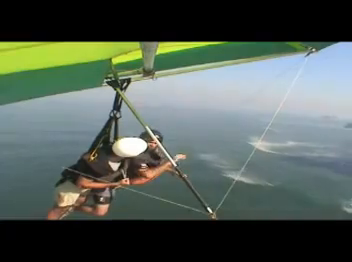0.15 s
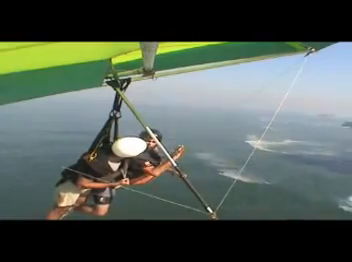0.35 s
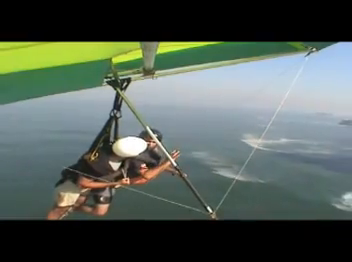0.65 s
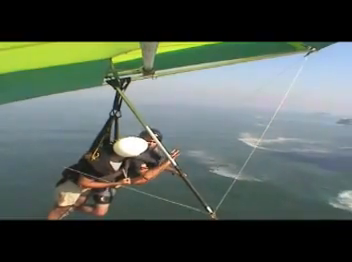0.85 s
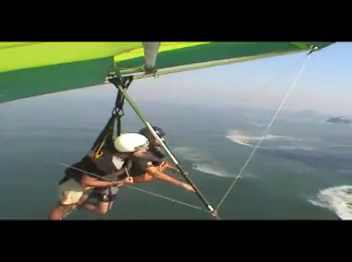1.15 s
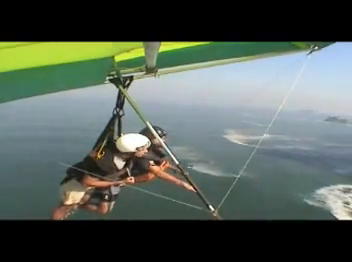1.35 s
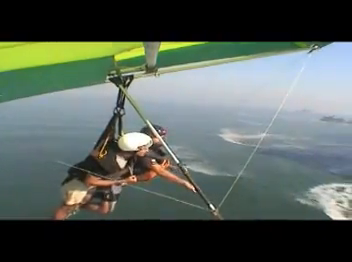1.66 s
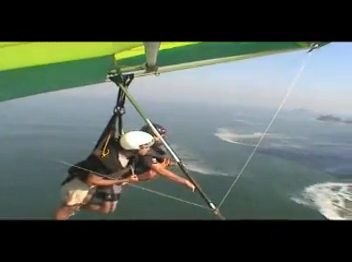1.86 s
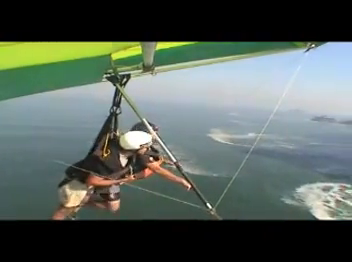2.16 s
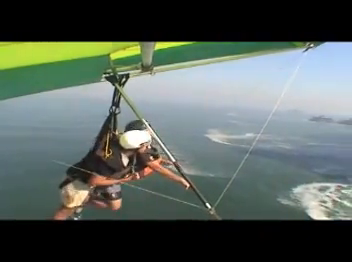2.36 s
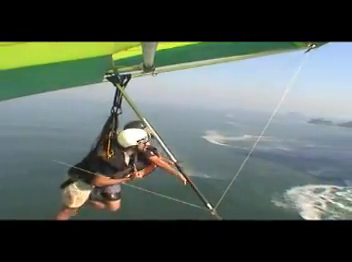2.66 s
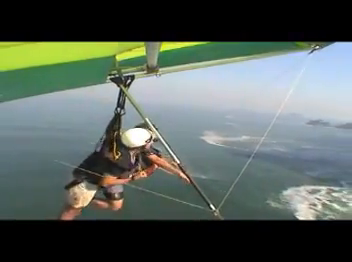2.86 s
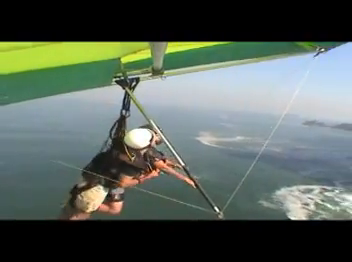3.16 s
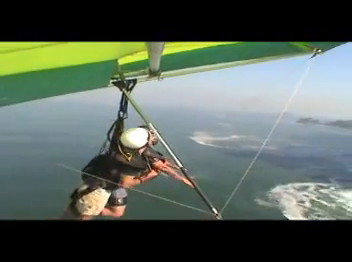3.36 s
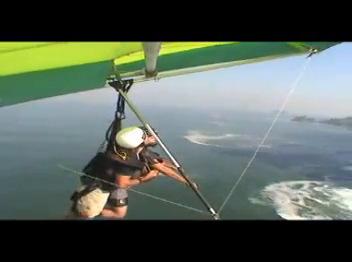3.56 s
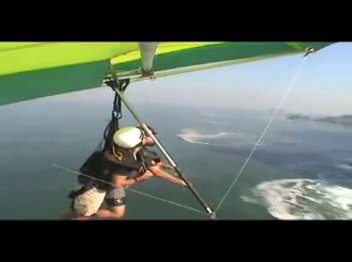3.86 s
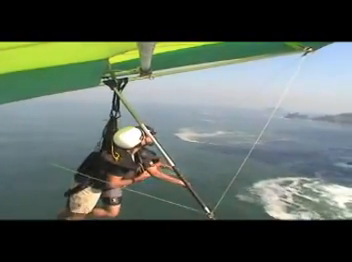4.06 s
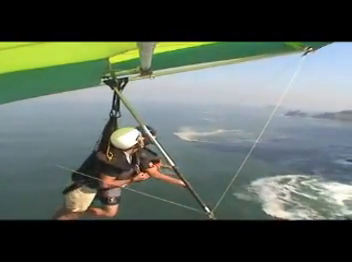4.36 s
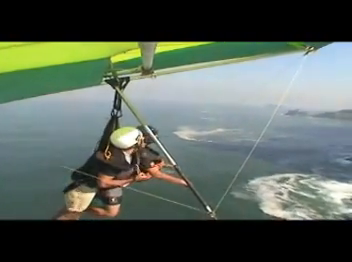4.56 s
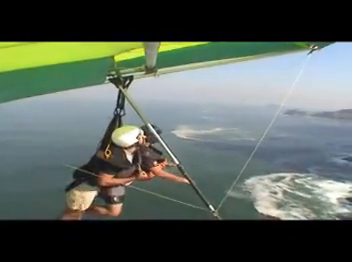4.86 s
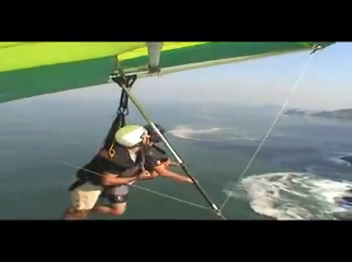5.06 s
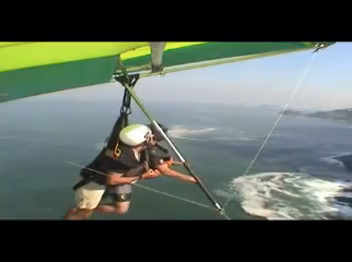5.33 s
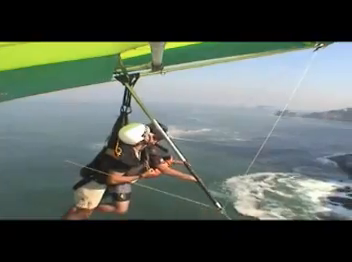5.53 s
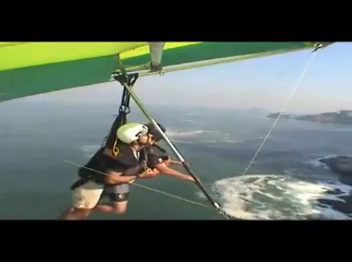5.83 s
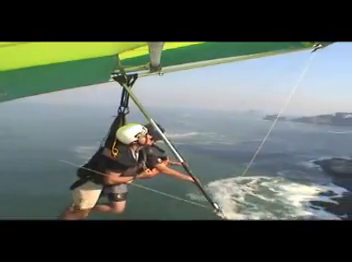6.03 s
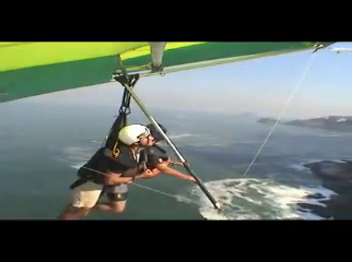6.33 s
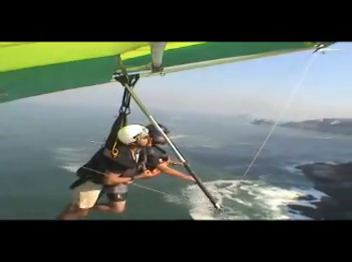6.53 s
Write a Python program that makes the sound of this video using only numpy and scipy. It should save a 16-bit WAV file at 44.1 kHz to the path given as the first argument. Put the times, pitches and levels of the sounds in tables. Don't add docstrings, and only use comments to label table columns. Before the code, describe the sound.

A harsh, overloaded rush of airstream fills both ears throughout, gusting unevenly left and right, cut once by a split-second mute near the start.

```python
import sys
import numpy as np
from scipy import signal
from scipy.fft import rfft, irfft, next_fast_len
from scipy.io import wavfile
from scipy.ndimage import uniform_filter1d

SR = 44100
rng = np.random.default_rng(int(sys.argv[2]) if len(sys.argv) > 2 else 0)


def boost_factor(decibels):
    exponent = np.asarray(decibels, float) / 20
    return 10 ** exponent


def log_audio(samples):
    frames = np.atleast_2d(samples).T
    limited = np.clip(frames, -1, 1)
    pcm = np.round(limited * 32767).astype(np.int16)
    wavfile.write(sys.argv[1], SR, pcm)


N = 295029

# (time [s], strength [dB], left-right lean [dB], eddy centre [Hz])
AIRSTREAM = [(0.0, -1, 2.5, 481), (0.25, -3.5, 1, 513), (0.7, -1, 0.3, 523), (1.4, 0.5, -1.5, 466),
             (1.9, 0, 2, 564), (2.25, 0.4, 0.5, 464), (2.55, -1, -3, 511), (3.0, -1.9, -0.2, 427),
             (3.5, 0.6, 3, 573), (3.85, -2.6, -0.5, 594), (4.15, 0.7, 0.5, 488), (4.55, -0.4, 0.5, 567),
             (4.8, 1.5, -2.5, 500), (5.2, 2.5, 1.3, 510), (5.55, -2, -1.5, 487), (5.9, 1, 3.5, 477),
             (6.3, -1.5, -7, 506), (6.69, 0, 0.9, 479)]
# (frequency [Hz], level per Hz [dB])
EDDY_SPECTRUM = [(20, 4), (60, -24.5), (120, -8), (250, -1), (450, 4), (750, 0.5), (1200, -6.5),
                 (2000, -23.5), (4000, -30), (8000, -55), (16000, -71)]
# (frequency [Hz], likeness [-1..1])
PORT_LIKENESS = [(40, -0.33), (100, -0.78), (200, -0.49), (500, -0.6), (900, -0.51), (1600, -0.27),
                 (3000, -0.087)]
# (frequency [Hz], left lead beyond the push-pull [rad])
SWEEP = [(60, .3), (340, .35), (860, -.25), (1800, 0), (3000, 0)]
# (time [s], left level [dB], right level [dB])
PUFFS = [(0.17, -0.5, 2.5), (0.409, 4.5, 4), (0.713, 6, 4), (0.873, 0.5, -2.5), (1.003, 1, 1.5),
         (1.063, -4, -5), (1.437, -1.5, -3.6), (1.546, -3, 0.5), (1.646, -1.5, 0.5), (1.776, -1.5, 0.5),
         (2.11, -4, -0.5), (2.355, -1.5, -7), (2.634, 4.5, 5), (2.903, 2.5, 5.5), (2.968, 3.5, 2),
         (3.183, 2.7, 1.5), (3.322, -1.9, -1.4), (3.617, 1.5, 1.8), (3.826, 5.5, 3), (3.981, 3, 2.5),
         (4.58, 7, 0.8), (4.789, 2, -1), (5.393, 0.5, -5.5), (5.672, -1, 4), (5.912, -4, -0.5),
         (6.216, -1, -6.5), (6.306, 5.5, -2), (6.425, 4, -3)]
# (time [s], left level [dB], right level [dB])
GAPS = [
    (.835, -3, -4),
    (2.75, -2.5, -3.5),
    (3.032, -5, -4.5),
    (3.9, -0.5, -2),
    (4.058, -7.5, -4),
    (4.703, -4, -5),
    (6.04, -7.5, -4),
    (6.12, -5, -4),
]
# (frequency [Hz], left-right level [dB])
PORT_BALANCE = [(30, -2), (200, 2), (500, -1), (1200, 1.2), (2500, 0), (4500, -3.5), (7000, -0.5),
                (12000, 0)]
# (frequency [Hz], level [dB])
RECORDER_COLOUR = [(20, -1), (100, 2), (2000, -1.5), (5000, -0.5), (9000, 0.5), (12900, 2.5), (13200, -4),
                   (15700, -4), (20000, -22)]
# (frequency [Hz], level [dB])
GRAIN_SPECTRUM = [(100, -13), (600, -12), (1500, -6), (3000, -5), (6000, -8), (12000, -10)]
# (start [s], end [s])
DROPOUT = (1.1087, 1.2336)


def rms_one(x):
    return x / np.sqrt(np.mean(x ** 2) + 1e-20)


def in_time(rows):
    s, *columns = np.transpose(rows)
    return [np.interp(np.arange(N) / SR, s, column) for column in columns]


def at_hz(points, hz):
    table_hz, values = np.transpose(points)
    return np.interp(np.log(hz), np.log(table_hz), values)


def shape(x, gain):
    size = next_fast_len(N)
    hz = np.linspace(1, SR / 2, size // 2 + 1)
    return irfft(rfft(x, size) * gain(hz), size)[..., :N]


def drift(rate_hz):
    pole = np.exp(-80 * np.pi * rate_hz / SR)
    coarse = rng.standard_normal(N // 40 + 2002)
    slow = signal.lfilter([1], [1, -2 * pole, pole ** 2], coarse)[2000:]
    return np.interp(np.arange(N) / 40, np.arange(len(slow)), rms_one(slow))


def eddies(centre_hz, tilt, patchy_db):
    out = 0
    edges_hz = 20 * 2 ** np.arange(0, 10, .5)
    white = rng.standard_normal((2, 2, N))
    speed_octaves = np.log2(centre_hz / np.median(centre_hz))
    for k, (low, high) in enumerate(zip(edges_hz, edges_hz[1:])):
        band = signal.butter(2, [low, high], "band", fs=SR, output="sos")
        mid, side = signal.sosfilt(band, white[k % 2])
        hz = np.sqrt(low * high)
        alike = np.clip(at_hz(PORT_LIKENESS, hz), -1, 1)
        slope_db = tilt * speed_octaves * np.clip(np.log2(hz / 500), -2, 2)
        gain = boost_factor(at_hz(EDDY_SPECTRUM, hz) + slope_db + patchy_db * drift(11.7))
        push_pull = np.sqrt(1 - alike) * side * [[1], [-1]]
        out = out + gain * (np.sqrt(1 + alike) * mid + push_pull)
    return rms_one(out)


def puffs(rows, spread_s):
    s, left_db, right_db = np.transpose(rows)
    coarse_s = np.arange(0, N, 40) / SR
    bells = np.exp(-.5 * ((coarse_s - s[:, None]) / spread_s) ** 2)
    now_s = np.arange(N) / SR
    return np.array([np.interp(now_s, coarse_s, db @ bells) for db in (left_db, right_db)])


def overload(x, top, hardness):
    return x / (1 + np.abs(x / top) ** hardness) ** (1 / hardness)


def droop(x, cut_hz):
    return signal.lfilter(*signal.butter(1, cut_hz, "high", fs=SR), x)


def dropout():
    start_s, end_s = DROPOUT
    playing = np.ones(N)
    playing[round(start_s * SR):round(end_s * SR)] = 0
    return uniform_filter1d(playing, size=24)


def smear(x, size=384):
    overlap = size * 3 // 4
    hz, _, frames = signal.stft(x, SR, nperseg=size, noverlap=overlap)
    grain_gain = boost_factor(at_hz(GRAIN_SPECTRUM, hz + 1))[:, None]
    turned = frames * grain_gain * np.exp(2j * np.pi * rng.random(frames.shape))
    return x + signal.istft(turned, nperseg=size, noverlap=overlap)[1][:, :N]


def scene():
    strength_db, lean_db, centre_hz = in_time(AIRSTREAM)
    hiss_db = strength_db + .5 * lean_db * np.array([[1], [-1]])
    hiss_db = hiss_db + puffs(PUFFS, spread_s=0.025) + puffs(GAPS, spread_s=0.0088)
    gust_db = 0.54 * hiss_db
    buffet_db = 0.73 * drift(40) + 0.79 * np.array([drift(56), drift(56)])
    left, right = eddies(centre_hz, tilt=3.2, patchy_db=0.53)
    left = shape(left, lambda hz: np.exp(1j * at_hz(SWEEP, hz)))
    return boost_factor(-0.43 + gust_db + buffet_db) * np.array([left, right])


def roll_off(x):
    return signal.sosfilt(signal.butter(12, 15750, fs=SR, output="sos"), x)


def record(dry):
    flat = droop(overload(dry, top=.92, hardness=11.0), cut_hz=38)
    flat = flat + np.array([[.019], [.003]])

    def colour(hz):
        return boost_factor(at_hz(RECORDER_COLOUR, hz) + at_hz(PORT_BALANCE, hz) * [[.5], [-.5]])

    x = shape(flat, colour) * dropout()
    clip_top = 1.1
    x = np.clip(smear(x), -clip_top, clip_top)
    return roll_off(x)


dry = scene()
out = record(dry)
log_audio(out)
```